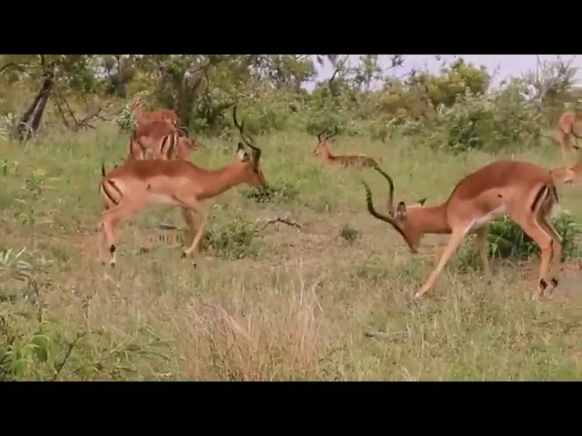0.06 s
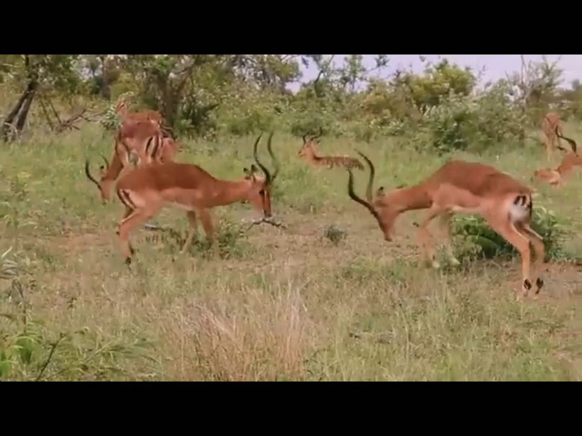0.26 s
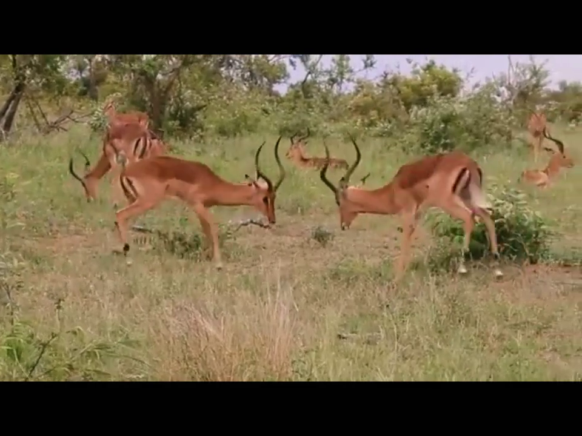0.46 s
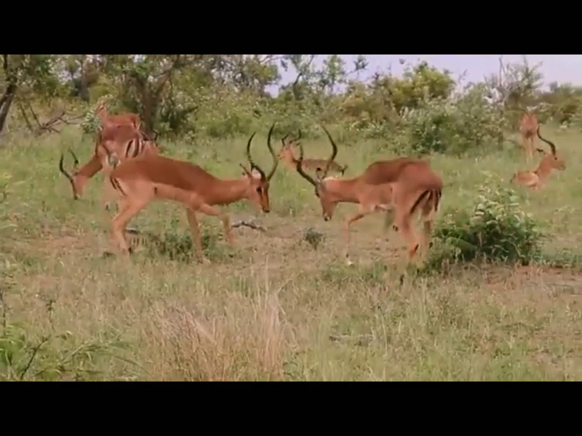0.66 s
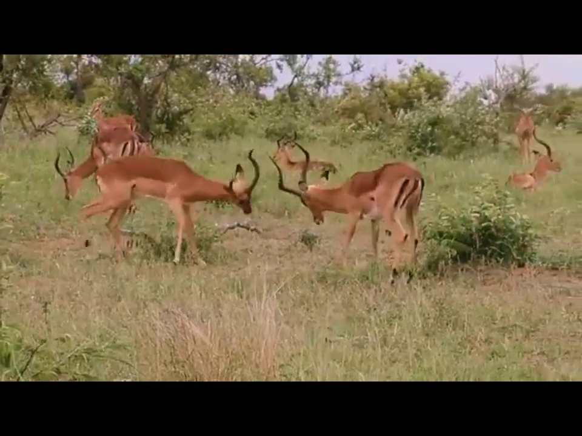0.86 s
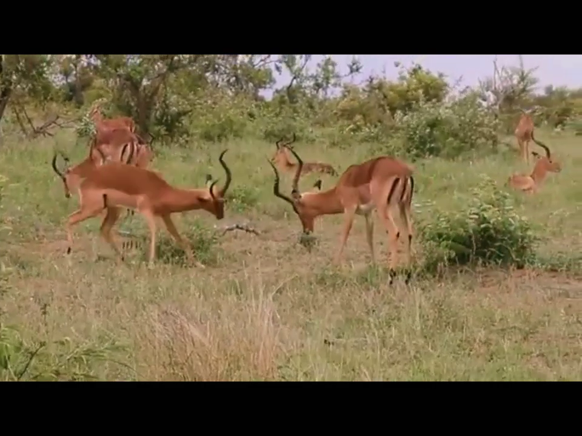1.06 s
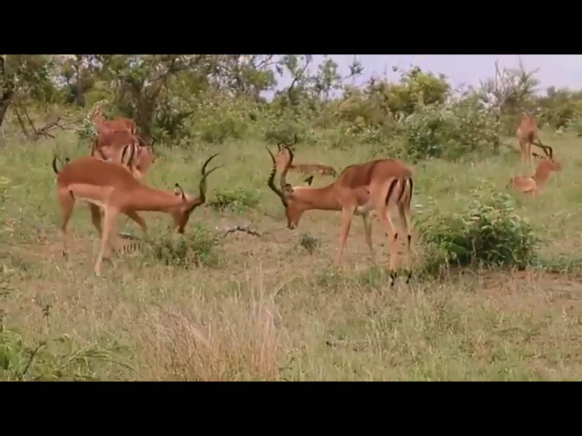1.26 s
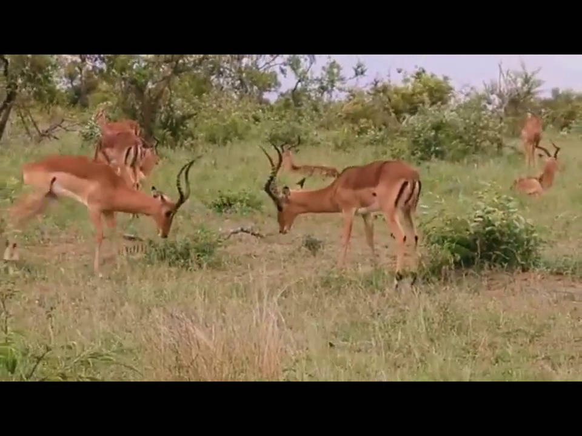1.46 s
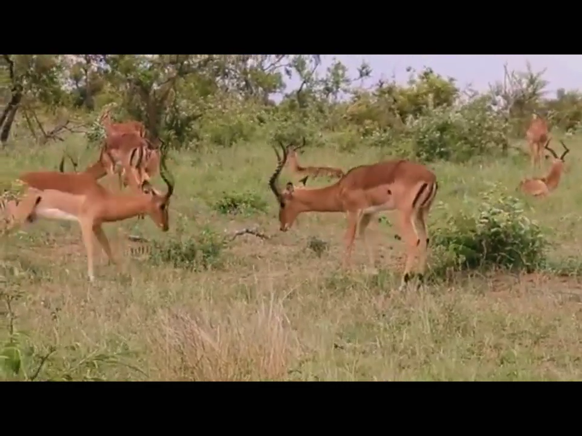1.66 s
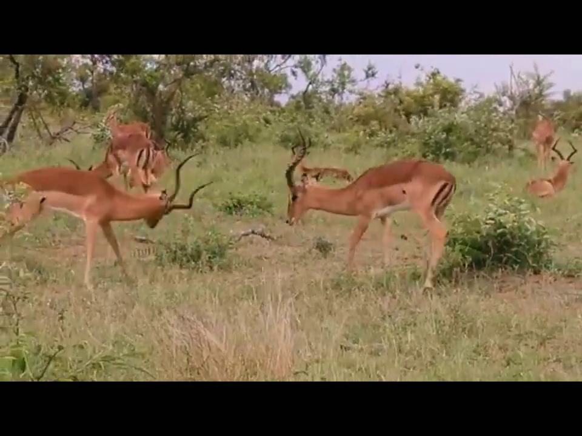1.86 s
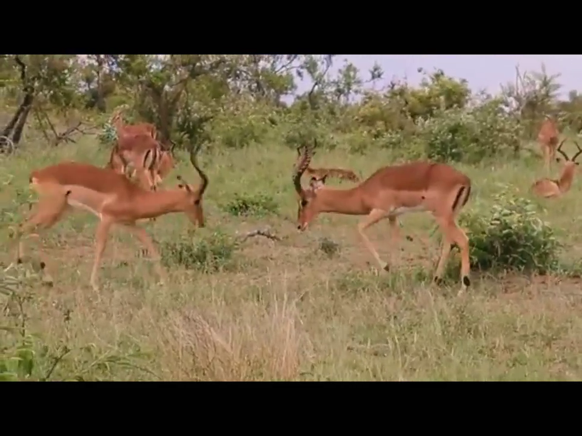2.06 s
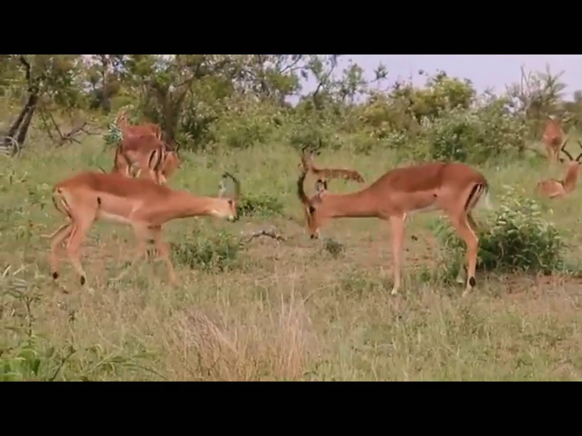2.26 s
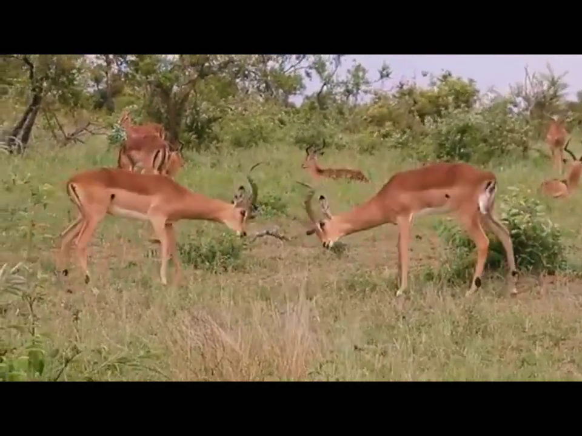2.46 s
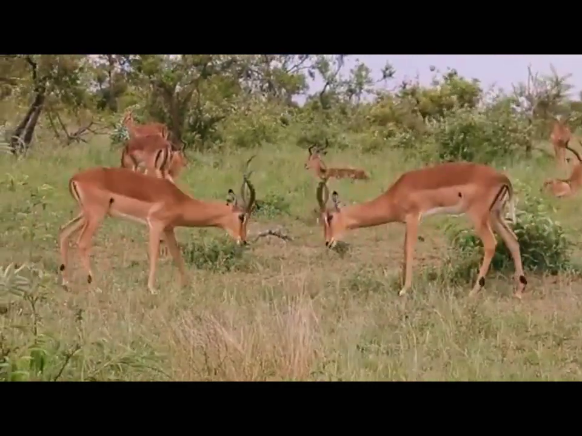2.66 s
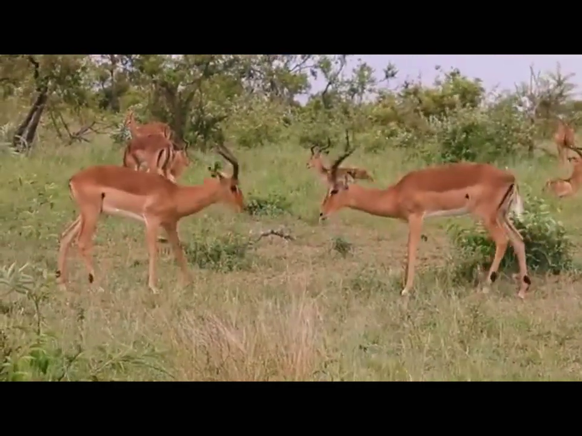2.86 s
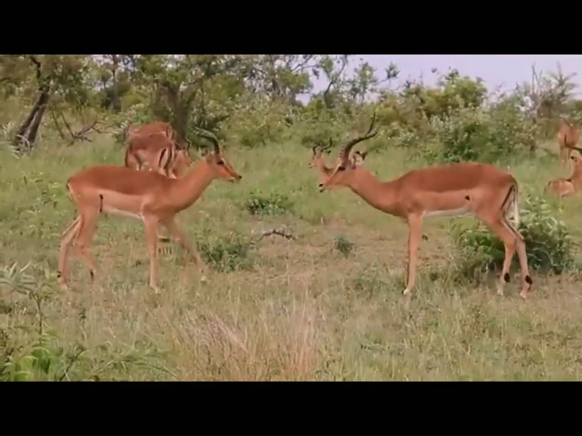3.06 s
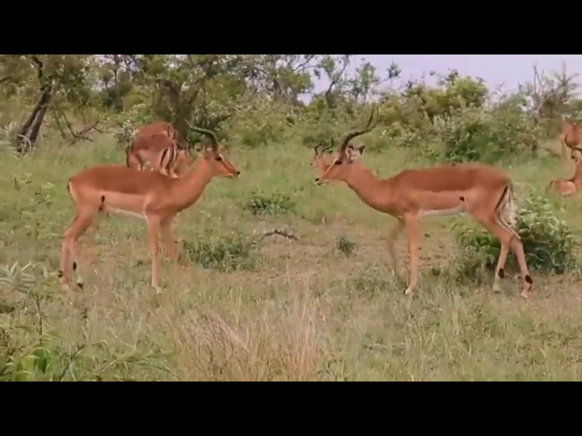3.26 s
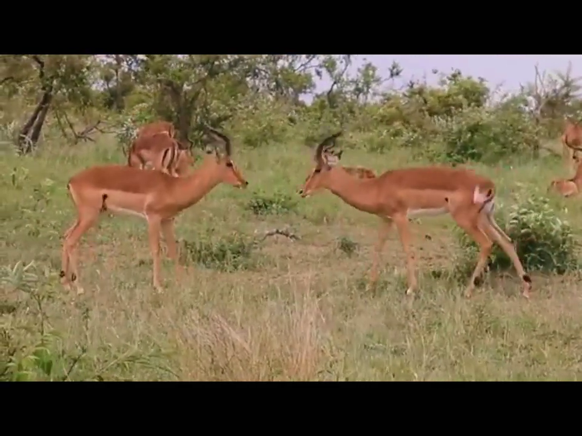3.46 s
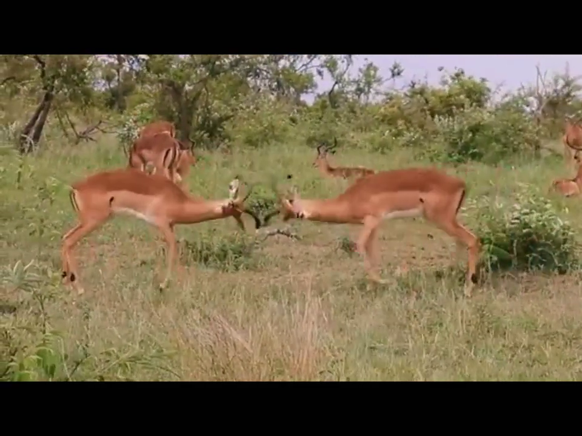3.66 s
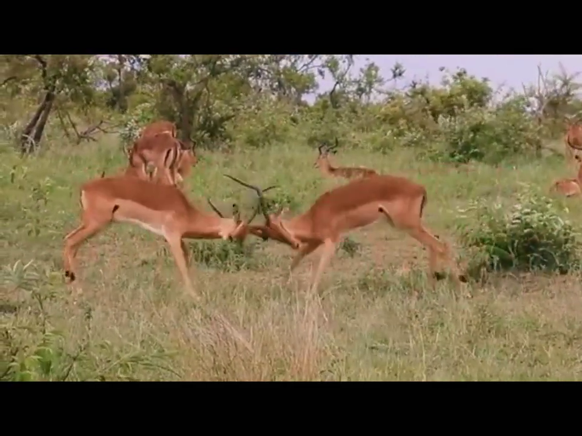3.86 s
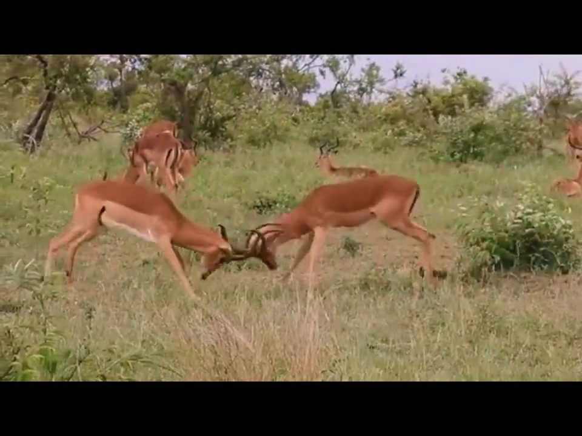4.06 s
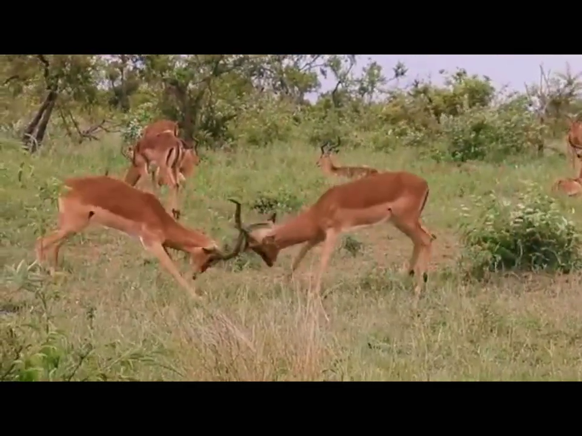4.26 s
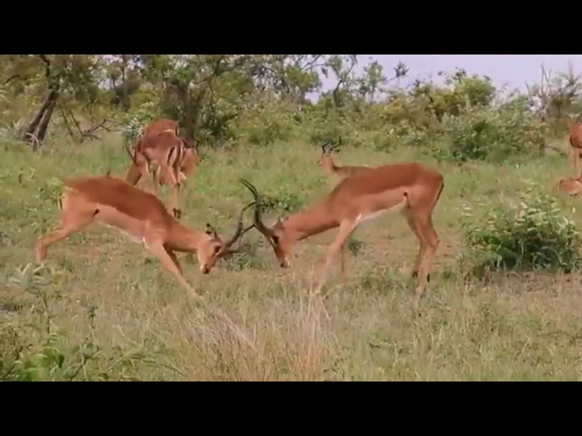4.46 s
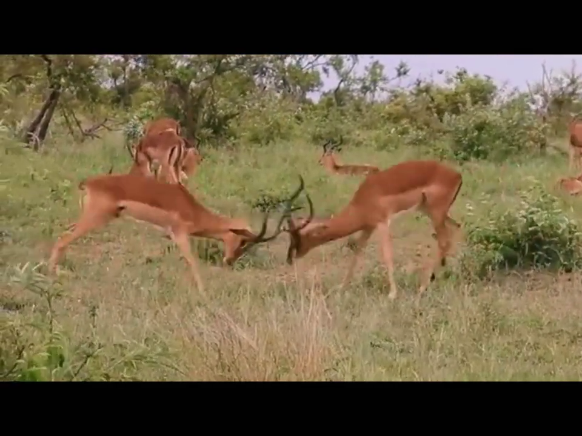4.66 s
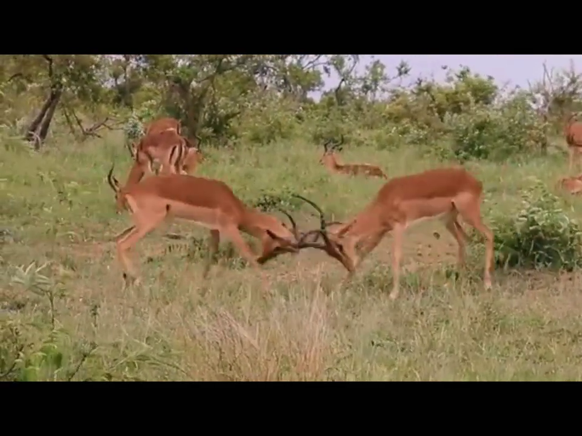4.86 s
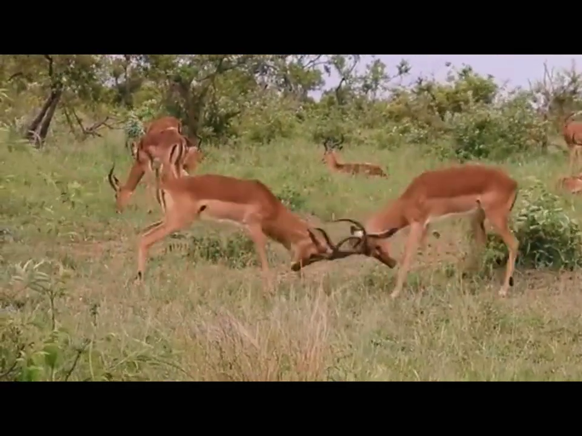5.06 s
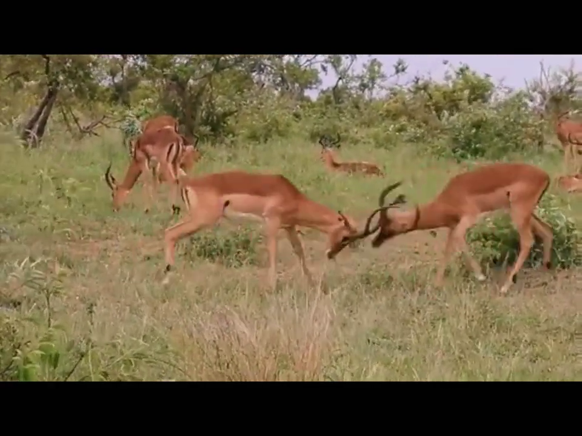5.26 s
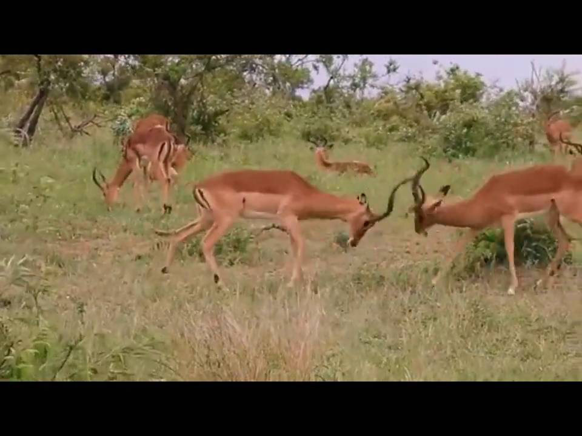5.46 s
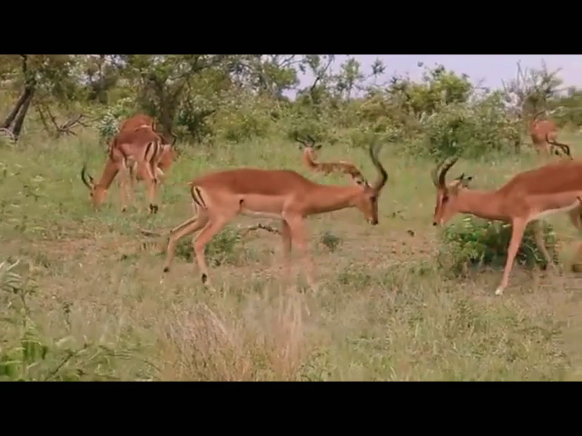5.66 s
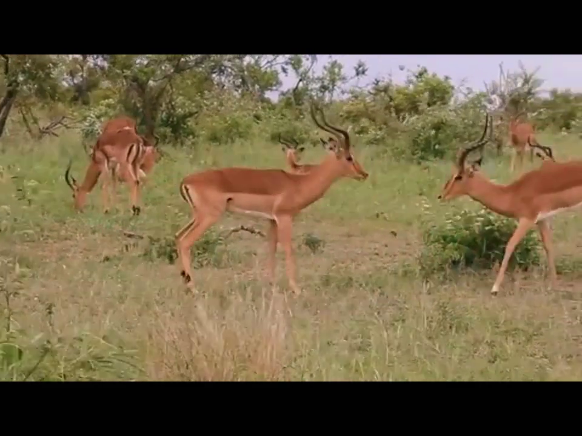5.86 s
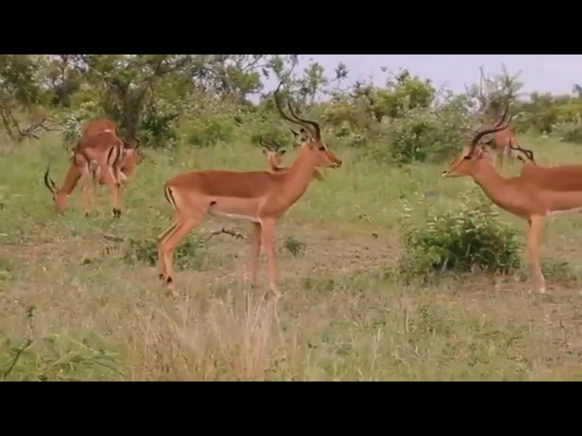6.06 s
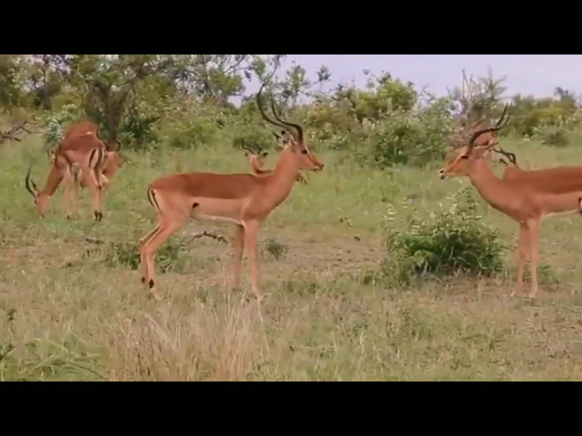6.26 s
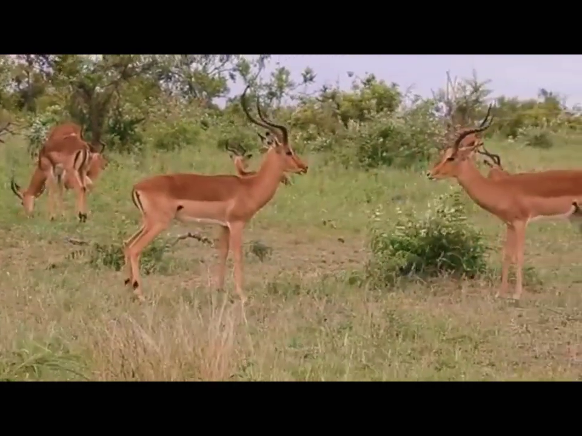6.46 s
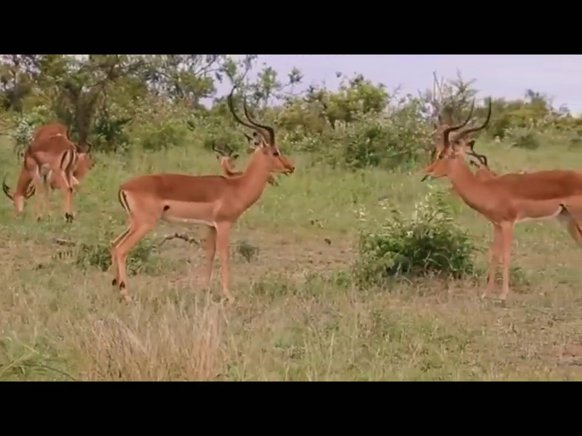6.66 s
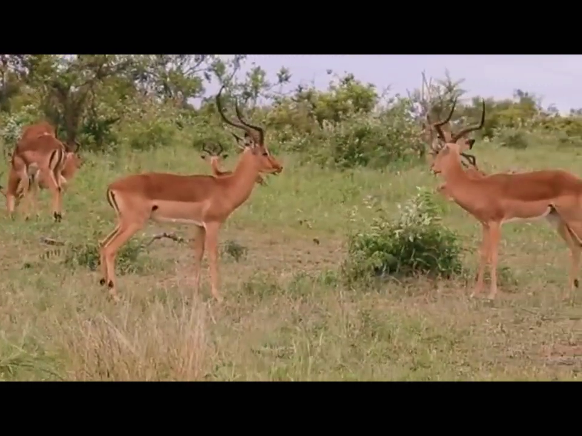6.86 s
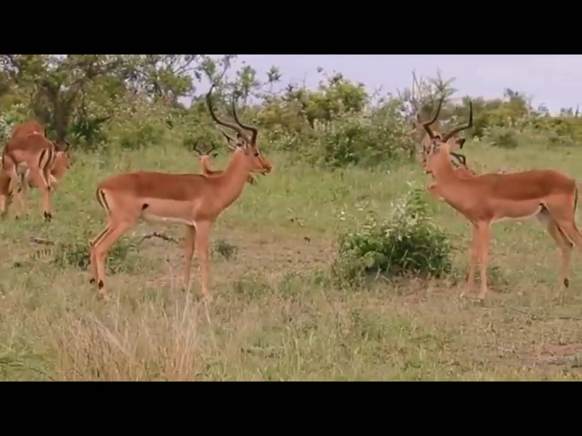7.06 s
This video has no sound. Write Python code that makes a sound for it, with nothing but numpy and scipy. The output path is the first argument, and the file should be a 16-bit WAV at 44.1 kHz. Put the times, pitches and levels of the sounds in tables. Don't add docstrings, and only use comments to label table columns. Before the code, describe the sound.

Sharp bony horn clash, scraping and scattered knocks from sparring antelope, over rustling grass, a thin constant hiss and small bird chirps.

```python
import sys
import numpy as np
from scipy import signal
from scipy.fft import rfft, irfft, next_fast_len
from scipy.io import wavfile
from scipy.ndimage import uniform_filter1d

SR = 44100
rng = np.random.default_rng(int(sys.argv[2]) if len(sys.argv) > 2 else 0)


def how_loud(loudness_db):
    steps = np.asarray(loudness_db, float) / 20
    return 10 ** steps


def output_pcm(signal):
    pcm = np.clip(np.atleast_2d(signal).T, -1, 1) * 32767
    wavfile.write(sys.argv[1], SR, np.round(pcm).astype(np.int16))


N = 314124
FAST = next_fast_len(N)
HIT_SAMPLES = 2600
LEFT_LAG, RIGHT_LAG = -10, 8


def at_hz(points, hz):
    table_hz, value = np.array(points)[:, 0], np.array(points)[:, 1]
    return np.interp(np.log(hz + 1e-9), np.log(table_hz), value)


def coloured(points, count):
    gain = how_loud(at_hz(points, np.fft.rfftfreq(FAST, 1 / SR)))
    noise = irfft(rfft(rng.standard_normal((count, FAST))) * gain, FAST)[:, :N]
    return noise / noise.std()


def drift(rate_hz):
    lowpass = signal.butter(2, rate_hz, fs=SR / 40, output="sos")
    slow = signal.sosfilt(lowpass, rng.standard_normal(N // 40 + 2002))[2000:]
    return np.interp(np.arange(N) / 40, np.arange(len(slow)), slow / slow.std())


def place(x, lag, pan_db):
    late = np.interp(np.arange(len(x)) - lag, np.arange(len(x)), x)
    return np.array([late * how_loud(pan_db / 2), x * how_loud(-pan_db / 2)])


def add(out, s, piece):
    i = round(s * SR)
    out[..., i:i + piece.shape[-1]] += piece[..., :N - i]


def ringing(t, hz, t60):
    return np.sin(2 * np.pi * hz * t) * how_loud(-60 * t / t60)


# freq_hz, density_db_per_hz
HISS_COLOUR = [(35, -68), (60, -83), (140, -52), (450, -32.5), (950, -6), (1500, 2), (2400, 2.5),
               (3400, -0.5), (5000, -6), (8000, -9.5), (12700, -15.5), (16000, -20)]
# freq_hz, share_0_to_1
AIMED_SHARE = [(300, 0.7), (900, .5), (1800, 0.56), (3500, 0.23), (5500, 0.2), (10000, .15)]


def bush():
    left, right, *diffuse = coloured(HISS_COLOUR, count=4)
    aimed = place(left * how_loud(2.2 * drift(3.0)), LEFT_LAG, 1.6)
    aimed = aimed + 0.8 * place(right * how_loud(1.5 * drift(2.9)), RIGHT_LAG, -3.0)
    share = np.clip(at_hz(AIMED_SHARE, np.fft.rfftfreq(FAST, 1 / SR)), 0, 1)
    both = np.sqrt(share / 1.57) * rfft(aimed, FAST) + np.sqrt(1 - share) * rfft(np.array(diffuse), FAST)
    return how_loud(-57 + 4.5) * irfft(both, FAST)[:, :N]


# time_s, level_db
RUSTLE_LEVEL = [(0.0, -56.7), (2.4, -57), (2.6, -58), (3.8, -54.5), (4.18, -55.5), (4.4, -53.5),
                (4.65, -56.5), (5.0, -54), (5.3, -56), (5.61, -55), (6.8, -56), (7.12, -58)]
# freq_hz, density_db_per_hz
GRASS_COLOUR = [(100, -60), (450, -30.5), (1000, -9.5), (1700, -3), (2800, 0), (4200, -3.5), (6000, -8),
                (9000, -21)]


def grass():
    s, db = np.transpose(RUSTLE_LEVEL)
    above = np.sqrt(np.maximum(how_loud(db) ** 2 - how_loud(db.min() + 1.5) ** 2, 0))
    movement = np.interp(np.arange(N) / SR, s, above)
    shared, *own = coloured(GRASS_COLOUR, count=3)
    grain = how_loud(2.2 * drift(90) + 1.6 * drift(12))
    return how_loud(-1.5) * movement * grain * (0.95 * shared + 1.2 * np.array(own))


# start_s, peak_db, pitch_hz, t60_s,
# left_lag_samples
BRIGHT_TICKS = [(6.8498, -34, 7900, .008, -6), (1.638, -48, 7500, .003, 0), (6.15, -50, 8000, .005, 0),
                (1.214, -43, 4750, .022, 0), (.517, -45, 3300, .005, 0), (.39, -47, 3200, .008, 0),
                (5.5897, -27, 6000, .008, 1), (5.5896, -33, 9000, .004, 1), (3.8213, -24, 6600, .006, 1),
                (3.8214, -17, 5200, .01, 1), (.6358, -38, 4600, .01, 1), (3.9552, -40, 5800, .004, 1),
                (3.522, -46, 3000, .004, 0)]


def bright_ticks():
    out, t = np.zeros((2, N)), np.arange(HIT_SAMPLES) / SR
    for s, peak_db, hz, t60, lag in BRIGHT_TICKS:
        tick = (ringing(t, hz, t60) + 0.35 * ringing(t, 1.12 * hz, t60)) / 1.3
        add(out, s, how_loud(peak_db) * place(tick, lag, 0))
    return out


# start_s, peak_db,
# low_ring_hz, high_ring_hz, high_over_low_db
HORN_CONTACTS = [(3.7903, -15.5, 3190, 4170, 5), (3.7935, -5.5, 2610, 4180, 6.5), (3.8007, -20, 2240, 3870, 7),
                 (3.8212, -5.5, 2660, 4540, 1.5), (3.8252, -22, 3190, 3900, 3), (3.8366, -25.5, 2760, 4010, 0),
                 (3.8412, -19, 2100, 4130, -4), (3.8457, -8.5, 2000, 3970, 5), (3.851, -8.5, 3120, 4300, 2.5),
                 (3.8564, -4.5, 2380, 3870, -1.5), (3.8663, -16.5, 2300, 3920, -7),
                 (3.8795, -27, 2300, 3900, -14), (3.9282, -28, 2300, 3300, 1), (3.9552, -33, 2200, 4400, 1),
                 (0.6357, -29, 2300, 3730, 9), (0.7958, -39.5, 1860, 4480, -11),
               (4.2755, -33, 2870, 4270, -4), (4.4764, -29, 1980, 3900, 0), (4.4789, -27.5, 2300, 2900, -1),
               (4.5064, -30, 2500, 4310, 1), (4.5559, -31, 2150, 3210, 2), (4.8603, -21.5, 2550, 4300, -8),
               (4.8678, -23.5, 2470, 3630, 2), (4.8754, -15, 1800, 4540, 6), (4.8794, -23, 1620, 3980, 0),
               (4.8862, -28, 2530, 3640, 7), (4.896, -29, 3000, 3680, 7), (5.4063, -19, 2450, 3300, 4),
               (5.5083, -32.5, 2560, 4130, 5), (5.5844, -24, 2600, 4100, 3), (5.5895, -15.5, 3360, 3530, 5),
               (5.6031, -35, 4000, 5510, 4), (5.8326, -39, 2220, 3800, 4.5), (6.3, -40, 1900, 4300, 4)]
# start_s, peak_db, centre_hz
FURTHER_CONTACTS = [(0.8016, -42, 3500), (3.8754, -33, 3500), (3.8876, -32, 2800), (3.9005, -40, 2500),
                    (3.9102, -32, 3400), (3.9231, -42, 2300), (3.9323, -38, 3200), (3.95, -38, 2400),
                    (4.2495, -39, 3200), (4.2538, -41, 3100), (4.422, -41, 2900), (4.4495, -38, 3200),
                    (4.4606, -40, 3200), (4.4626, -39.5, 2600), (4.4697, -35, 3160), (4.473, -34, 3000),
                    (4.467, -39, 3200), (4.4819, -41, 3300), (4.4924, -33, 3200), (4.5217, -35, 2700),
                    (4.8406, -38, 3200), (4.8482, -39, 2300), (4.8717, -32, 2800), (4.9044, -32, 3600),
                    (5.411, -39, 2600), (5.529, -37, 3150), (5.5352, -34, 3200), (5.5981, -36, 4300),
                    (5.5917, -27, 4000), (5.6077, -37, 4800)]
TAP_SPLIT = 1.08
CRACK_DB, CRACK_DB_PER_OCTAVE, CRACK_DB_PER_DB = -33.0, 22.0, -0.25


def contacts():
    taps = [(s, db, hz / TAP_SPLIT, hz * TAP_SPLIT, 0) for s, db, hz in FURTHER_CONTACTS]
    rows = []
    for s, peak_db, low_hz, high_hz, tilt_db in HORN_CONTACTS + taps:
        crack_db = CRACK_DB + CRACK_DB_PER_OCTAVE * np.log2(high_hz / 4000) + CRACK_DB_PER_DB * peak_db
        rows.append((s, peak_db, low_hz, high_hz, tilt_db, crack_db))
    return rows


# pitch_hz, level_db, t60_s
HORN_BODY = [(1250, -22, .03), (1750, -20, .024), (2350, -21, .016), (2950, -21, .014), (4000, -24, .012),
             (5200, -23, .008)]


def horns():
    out, t = np.zeros((2, N)), np.arange(HIT_SAMPLES) / SR
    rows = contacts()
    chance = rng.normal(size=(len(rows), len(HORN_BODY) + 1))
    white = rng.standard_normal((len(rows), 3, len(t)))
    scatter_band = signal.butter(2, [1500, 5200], "band", fs=SR, output="sos")
    crack_band = signal.butter(2, [5500, 11000], "band", fs=SR, output="sos")
    scatter_shape = (how_loud(-60 * t / 0.023) + how_loud(-21 - 60 * t / 0.097)) * np.minimum(t / 0.0019, 1)
    for (s, peak_db, low_hz, high_hz, tilt_db, crack_db), luck, noise in zip(rows, chance, white):
        hit = how_loud(-tilt_db / 2) * np.sin(2 * np.pi * low_hz * t)
        hit += how_loud(tilt_db / 2) * ringing(t, high_hz, 0.04)
        hit *= how_loud(-60 * t / 0.0035) + 0.3 * how_loud(-60 * t / 0.014)
        hit += 0.28 * ringing(t, np.sqrt(low_hz * high_hz), 0.0046)
        hit = hit / np.abs(hit).max()
        body = 0
        for (hz, db, t60), k in zip(HORN_BODY, luck):
            mode_db = db + 2.4 * k - 15.0 * max(np.log2(low_hz / hz), 0)
            body = body + how_loud(mode_db) * ringing(t, hz * (1 + 0.041 * k), t60)
        hit += body
        hit *= np.minimum(t / 0.00036, 1)
        hit = hit / np.abs(hit).max()
        hit += how_loud(crack_db + 4.5) * signal.sosfilt(crack_band, noise[0] * how_loud(-60 * t / 0.0036))
        scatter = signal.sosfilt(scatter_band, noise[1:] * scatter_shape)
        heard = place(hit, 0.9, -0.3 + 0.8 * luck[-1])
        add(out, s, how_loud(peak_db) * (heard + how_loud(-14.5) * scatter))
    return out


# start_s, length_s, first_hz, width_hz, level_db
BIRD_CHURRS = [
    (1.06, 0.12, 3960, 700, -53.5),
    (1.1, 0.085, 4980, 400, -57),
    (1.097, 0.088, 2990, 400, -57),
    (1.04, .15, 4700, 2600, -56.5),
    (1.5, 0.088, 3720, 500, -55.5),
    (1.56, 0.096, 2290, 1200, -52.5),
    (5.02, .12, 5900, 900, -60),
]
# start_s, length_s, first_hz, last_hz, level_db
BIRD_WHISTLES = [(1.905, 0.04, 2400, 2300, -48), (1.938, .028, 2300, 2450, -50),
                 (2.02, .09, 3190, 3150, -52), (2.304, 0.047, 2390, 2500, -51),
                 (2.394, 0.033, 2950, 2580, -51), (2.445, .11, 3095, 3085, -51.5),
                 (2.46, 0.086, 4120, 4160, -58), (2.795, .03, 2785, 2785, -57),
                 (2.85, 0.047, 2800, 2090, -47), (3.28, 0.13, 2490, 2420, -55),
                 (3.625, .027, 2400, 2370, -49), (3.66, .022, 2380, 2380, -49),
                 (1.885, .03, 2660, 2570, -55), (3.672, 0.032, 1980, 1900, -52),
                 (4.301, .04, 3200, 2960, -49), (4.384, 0.024, 3520, 3280, -47),
                 (4.595, .045, 3500, 3340, -49.5), (5.024, 0.035, 3080, 3050, -50.5),
                 (1.98, .03, 2800, 3000, -55)]
# time_s, pitch_hz, level_db
BIRD_PHRASES = [
    [(1.584, 3310, -64), (1.596, 3385, -48), (1.626, 3490, -50), (1.646, 3390, -56), (1.675, 3450, -68)],
    [(3.735, 2960, -66), (3.741, 2900, -54), (3.757, 2890, -53), (3.764, 2990, -52), (3.77, 3330, -55),
     (3.781, 2700, -55), (3.79, 2450, -60)],
    [(5.642, 2730, -68), (5.654, 2730, -60), (5.7, 2755, -53.5), (5.72, 2740, -57), (5.775, 2835, -55.5),
     (5.791, 2760, -59), (5.8, 2760, -70)],
    [(6.67, 4150, -70), (6.71, 3880, -66), (6.748, 3700, -59), (6.768, 3670, -61), (6.78, 3400, -67),
     (6.794, 3150, -57), (6.815, 2950, -65), (6.836, 2800, -71)],
    [(6.846, 3680, -70), (6.86, 3600, -64), (6.884, 3400, -58), (6.916, 3370, -57), (6.93, 3200, -69)],
]


def birds():
    out, waver, wobble_hz = np.zeros(N), how_loud(1.2 * drift(45)), 18 * drift(60)
    for s, length, first_hz, last_hz, db in BIRD_WHISTLES:
        u = np.linspace(0, 1, round(length * SR))
        pitch = first_hz + (last_hz - first_hz) * u + wobble_hz[round(s * SR):][:len(u)]
        add(out, s, how_loud(db + 2.5) * np.sin(np.pi * u) ** 0.38 * np.sin(2 * np.pi * np.cumsum(pitch) / SR))
    for rows in BIRD_PHRASES:
        s, hz, db = np.transpose(rows)
        t = np.arange(s[0], s[-1], 1 / SR)
        pitch = uniform_filter1d(np.interp(t, s, hz), size=200)
        pitch = pitch + wobble_hz[round(s[0] * SR):][:len(t)]
        add(out, s[0], how_loud(np.interp(t, s, db) + 11.0) * np.sin(2 * np.pi * np.cumsum(pitch) / SR))
    hoarse, white = np.zeros(N), rng.standard_normal((2, N))
    for s, length, first_hz, width_hz, db in BIRD_CHURRS:
        u = np.linspace(0, 1, round(length * SR))
        lowpass = signal.butter(2, width_hz / 2, fs=SR, output="sos")
        a, b = signal.sosfilt(lowpass, white[:, round(s * SR):][:, :len(u)])
        phase = 2 * np.pi * np.cumsum(first_hz - 1500.0 * length * u) / SR
        churr = a * np.cos(phase) + b * np.sin(phase)
        add(hoarse, s, how_loud(db) * np.sin(np.pi * u) ** 0.39 * churr / churr.std())
    return place(out * waver, 7.36, -6) + place(hoarse, LEFT_LAG, -8)


# peak_s, peak_db, build_30db_s, fade_30db_s
GRATE_BOUTS = [
    (3.812, -47, .012, .15),
    (3.862, -34, .075, .045),
    (3.96, -50, .25, .12),
    (4.26, -52.5, .19, .3),
    (4.478, -45, .07, .06),
    (4.5, -56, .1, .2),
    (4.882, -41, .045, .085),
    (4.94, -61, .06, .3),
    (5.53, -57, .07, .2),
    (5.603, -50, .03, .04),
]


def grating():
    now = np.arange(N) / SR
    pressure = np.zeros(N)
    for s, db, build_s, fade_s in GRATE_BOUTS:
        pressure += how_loud(db - 30 * np.maximum((s - now) / build_s, (now - s) / fade_s))
    slips = (rng.random(N) < 1500 / SR) * rng.choice([-1, 1], N)
    slips = slips * how_loud(3.8 * np.minimum(rng.exponential(1, N), 4))
    t = np.arange(400) / SR
    dealt = rng.integers(0, len(HORN_BODY), N)
    rung = np.zeros(N)
    for k, (hz, level_db, t60) in enumerate(HORN_BODY):
        mode = signal.oaconvolve(slips * (dealt == k), ringing(t, hz, 0.37 * t60))[:N]
        rung += how_loud(level_db + 2.5 * np.log2(hz / 2500)) * mode
    return place(pressure * rung / rung.std(), 0.8, -0.5)


# start_s, peak_db, pitch_hz
HOOF_THUDS = [(3.793, -66, 363), (3.856, -82, 511), (4.149, -83, 476), (4.214, -75, 544), (4.227, -67, 401),
              (4.286, -72, 530), (4.339, -74, 417), (4.352, -72, 417), (4.389, -78, 213), (4.409, -84, 361),
              (4.494, -68, 527), (4.875, -73, 340), (5.589, -79, 331)]


def hooves():
    out, t = np.zeros(N), np.arange(HIT_SAMPLES) / SR
    for s, peak_db, hz in HOOF_THUDS:
        add(out, s, how_loud(peak_db + 5.5) * ringing(t, hz, 0.022) * np.minimum(t / 0.0016, 1))
    return out


# start_s, pips_per_s, first_hz, last_hz, peak_db
FAR_TRILL = (4.981, 44, 5300, 6250, -49)


def trill():
    out, t = np.zeros(N), np.arange(800) / SR
    s, per_s, first_hz, last_hz, peak_db = FAR_TRILL
    white = rng.standard_normal((7, len(t)))
    for k, u in enumerate(np.linspace(0, 1, 7)):
        hz = first_hz + (last_hz - first_hz) * u
        band = signal.butter(2, [hz - 400, hz + 400], "band", fs=SR, output="sos")
        pip = signal.sosfilt(band, white[k])
        shape = how_loud(peak_db - 12 * (u - 0.55) ** 2 - 60 * t / 0.04) * np.minimum(t / 0.002, 1)
        add(out, s + k / per_s, shape * pip / pip.std())
    return place(out, 1, 0)


def scene():
    sharp = horns() + grating() + bright_ticks() + birds() + trill()
    bass_loss = signal.butter(4, 1300, "high", fs=SR, output="sos")
    thin = signal.sosfilt(bass_loss, sharp)
    top_limit = signal.ellip(10, 0.5, 60, 15800, fs=SR, output="sos")
    steady = signal.sosfilt(top_limit, bush() + grass())
    return thin + how_loud(-34) * sharp + hooves() + steady


def roll_off(x):
    return signal.sosfilt(signal.butter(12, 16670, fs=SR, output="sos"), x)


def record(dry):
    return roll_off(dry)


dry = scene()
out = record(dry)
output_pcm(out)
```